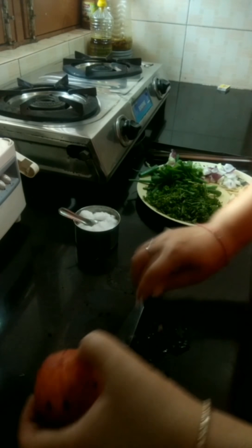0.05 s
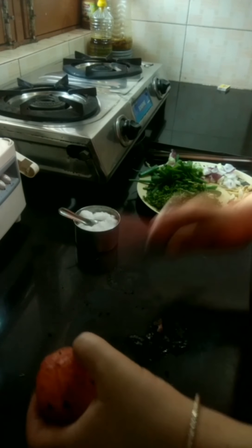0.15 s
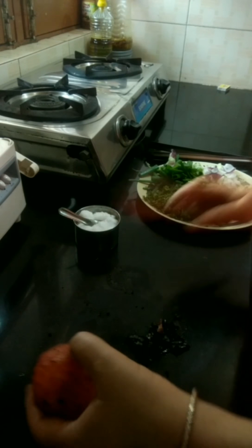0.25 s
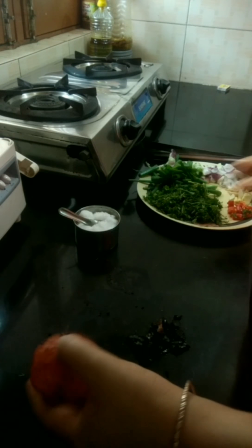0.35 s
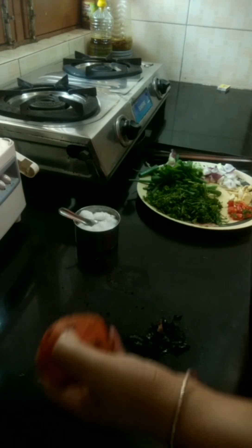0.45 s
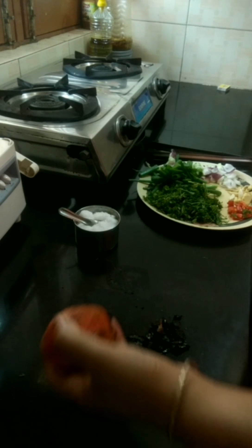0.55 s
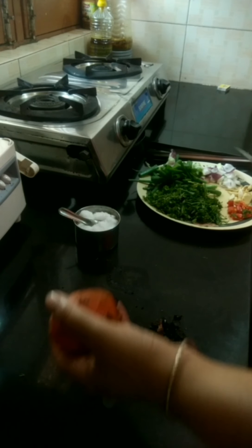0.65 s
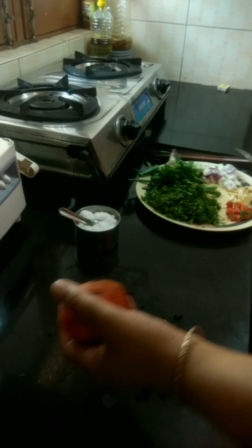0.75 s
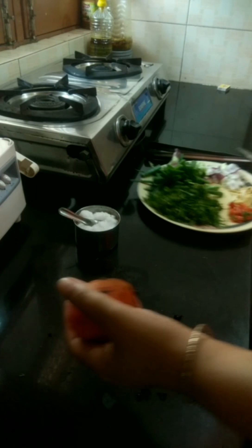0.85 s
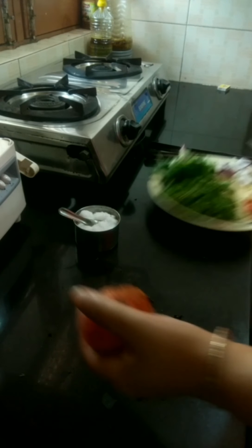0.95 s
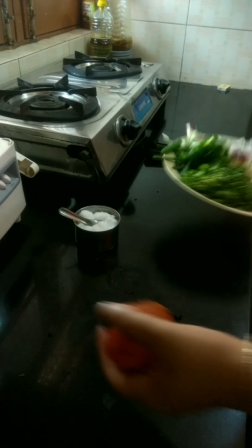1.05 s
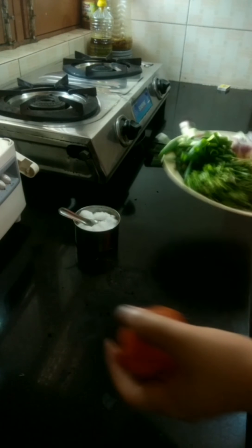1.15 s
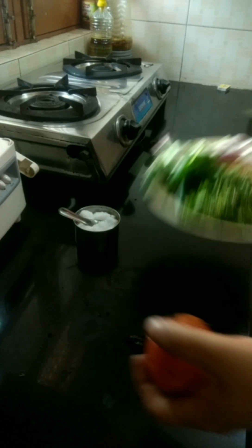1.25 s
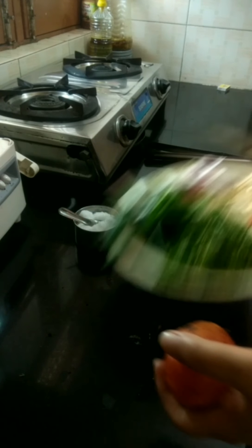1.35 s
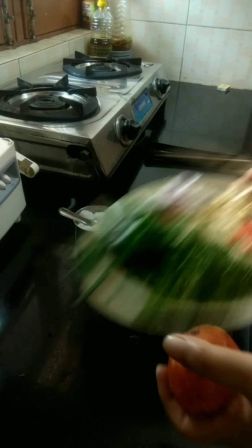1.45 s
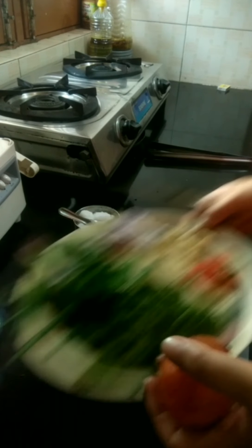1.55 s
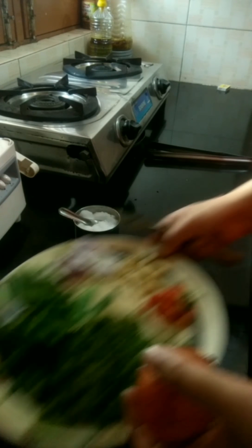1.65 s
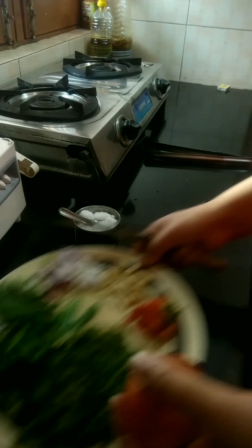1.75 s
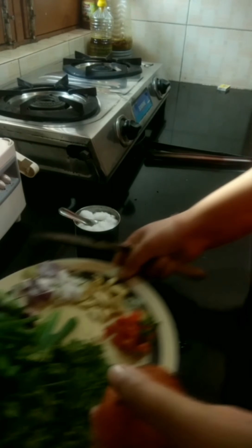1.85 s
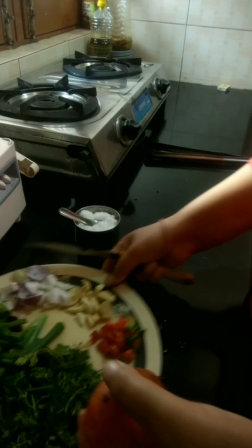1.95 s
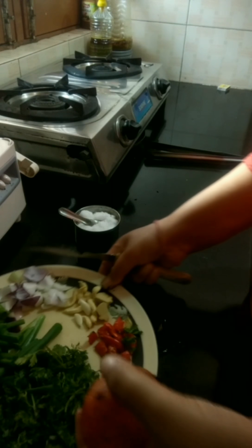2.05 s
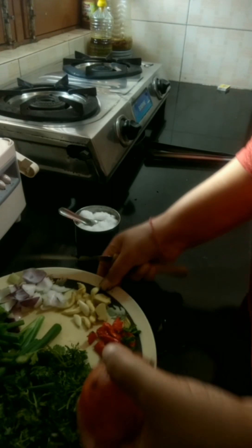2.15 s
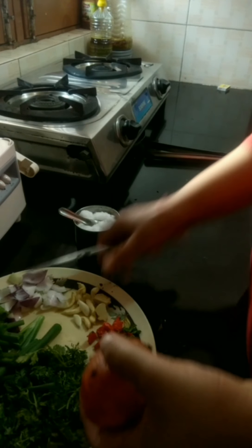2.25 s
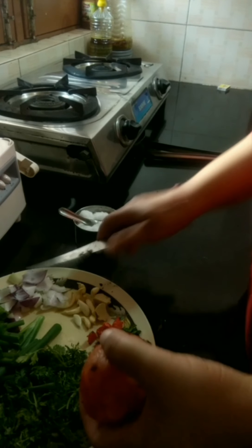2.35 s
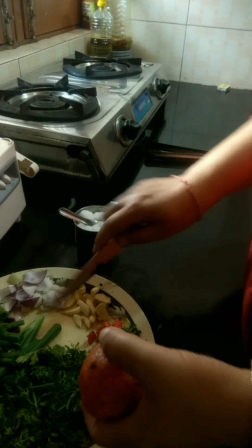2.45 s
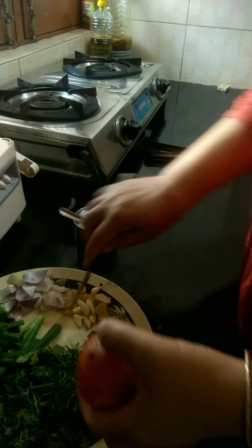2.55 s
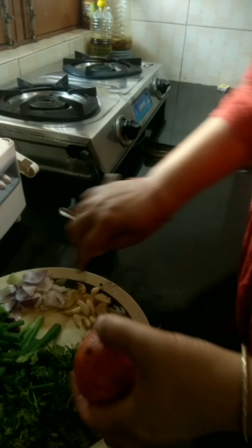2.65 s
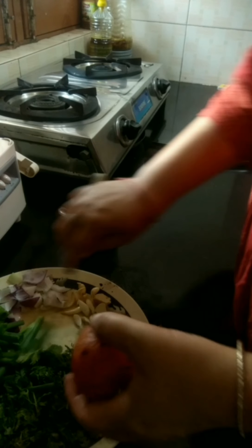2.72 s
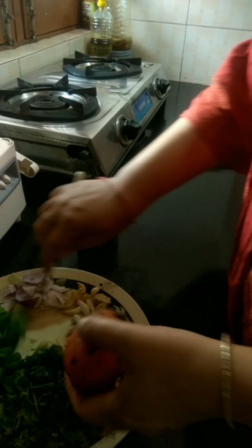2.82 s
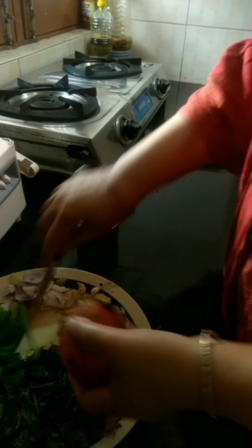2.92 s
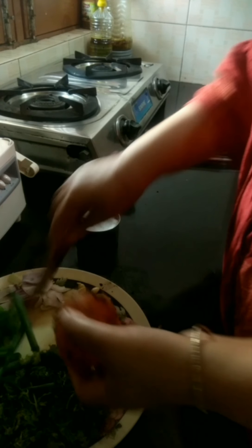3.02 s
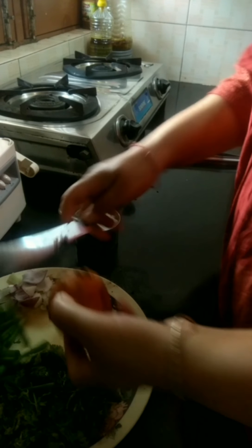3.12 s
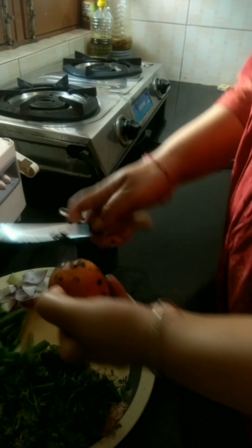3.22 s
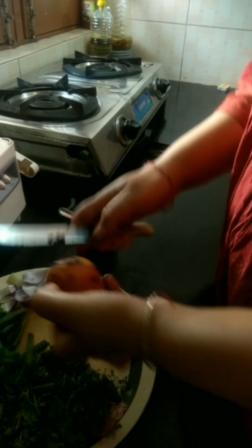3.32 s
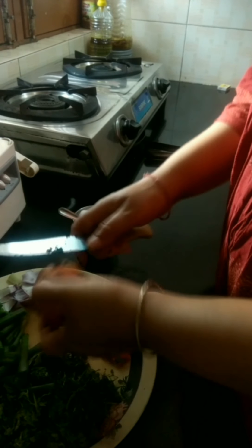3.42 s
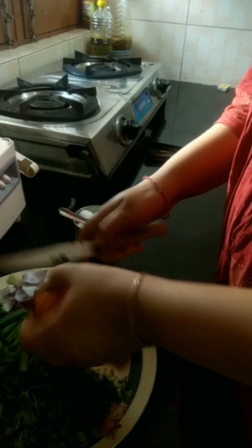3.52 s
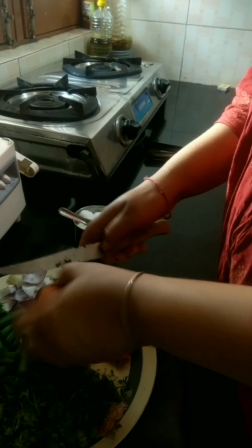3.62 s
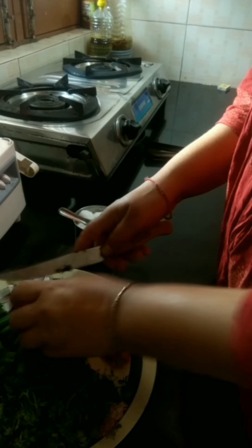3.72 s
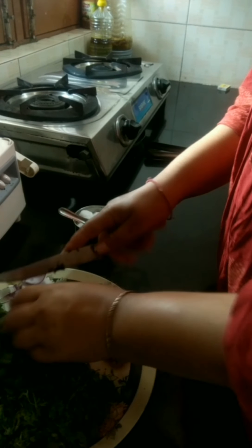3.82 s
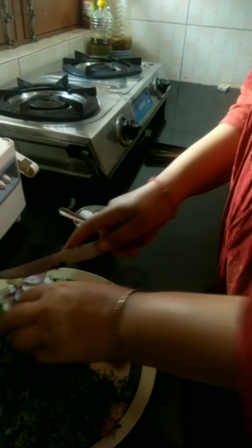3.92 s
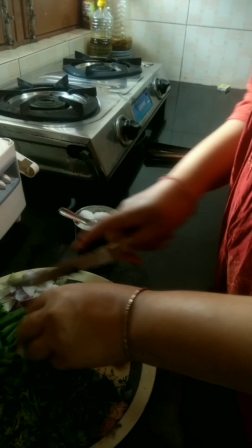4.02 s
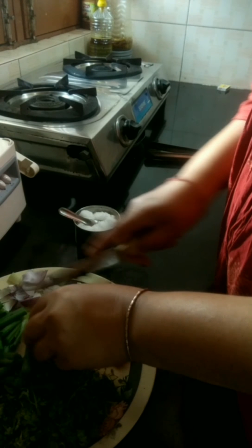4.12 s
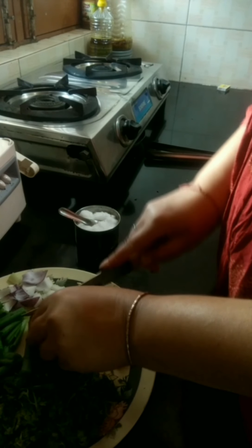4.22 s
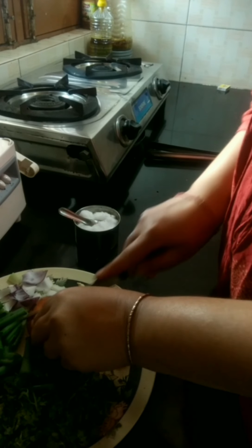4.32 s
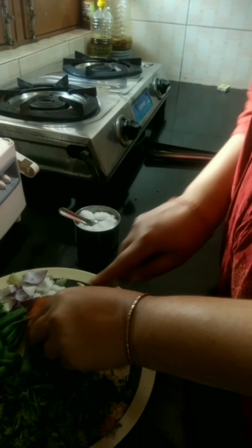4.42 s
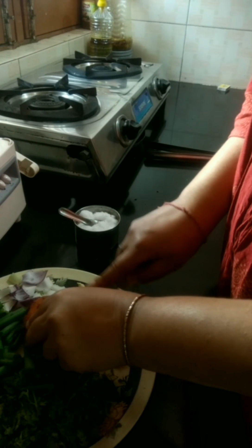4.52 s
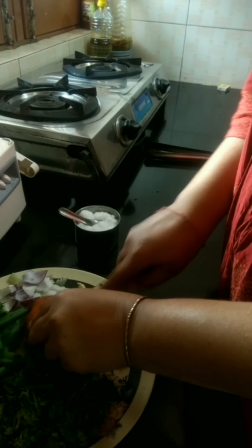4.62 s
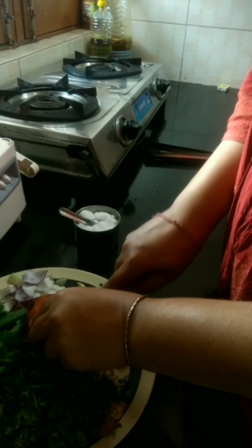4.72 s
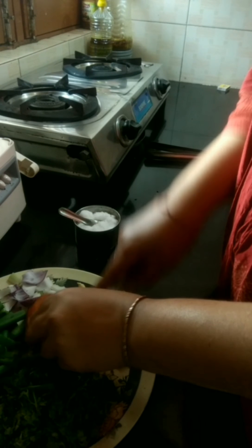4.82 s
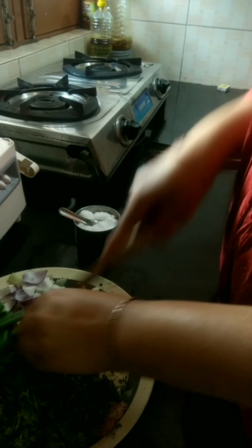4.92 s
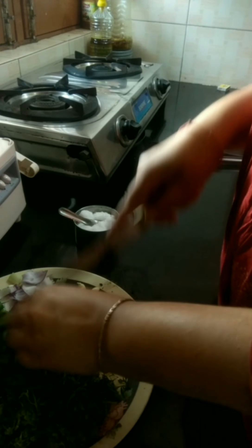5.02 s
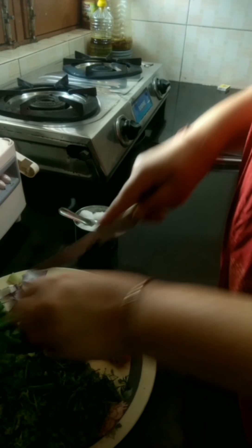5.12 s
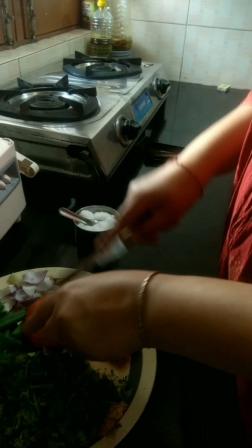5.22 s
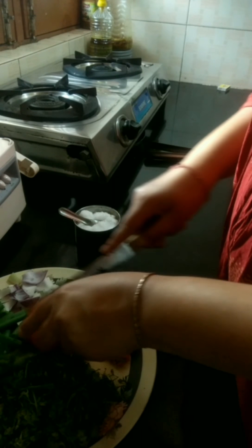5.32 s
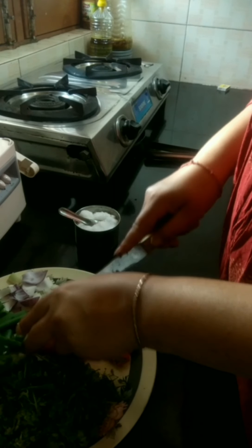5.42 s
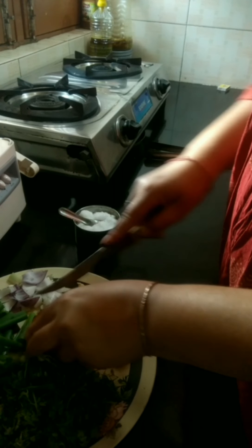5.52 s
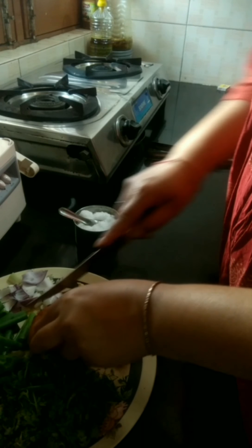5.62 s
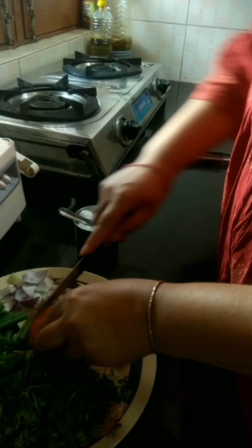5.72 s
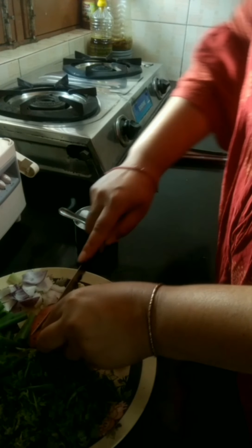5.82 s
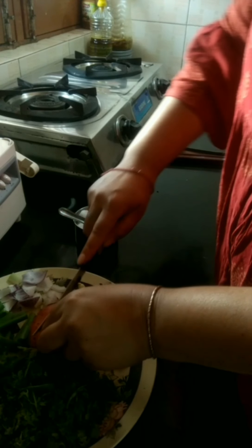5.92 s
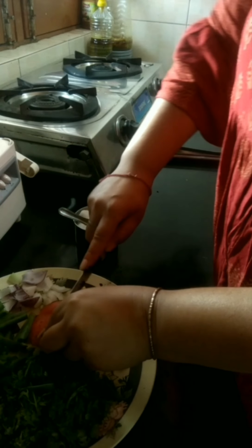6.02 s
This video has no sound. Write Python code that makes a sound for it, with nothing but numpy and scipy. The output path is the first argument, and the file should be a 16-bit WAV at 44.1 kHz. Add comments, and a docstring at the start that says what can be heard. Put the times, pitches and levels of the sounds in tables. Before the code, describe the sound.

Close, hissy stereo pickup in a hard little kitchen, with rumble and weak motor tones throughout. Fingers rustle faintly on food; a plastic plate meets the stone counter with two sharp clacks and dull booms. A short gritty knife scrape follows, stronger on the right. Then faint handling bumps, a quiet gap, and a crisp blade-on-plate knock with a trailing clatter. Only soft thumps and background remain.

```python
"""A broad hiss with a rumble and a faint motor hum fill a small tiled kitchen all through; noise and wavering tones make them.
Soft thuds and a rustle of fingers on food come first, then a plastic plate is set down on a stone counter.
A knife scrapes food across the plate; later, after another rustle, it cuts through a tomato onto it.
Contact bursts and scrape are random clicks that ring the plate (bursts also the blade); thuds are soft pushes on the counter.
Echoes follow, and two unequal microphone ports and a limiter hear it all."""
import sys
import numpy as np
from scipy import signal
from scipy.fft import rfft, irfft
from scipy.io import wavfile

SR = 44100
rng = np.random.default_rng(int(sys.argv[2]) if len(sys.argv) > 2 else 0)


def waveform_to_disk(signal):
    """Save audio, clipped to [-1, 1], as 16-bit WAV at the path in sys.argv[1]."""
    frames = np.transpose(np.atleast_2d(signal))
    scaled = np.clip(frames, -1, 1) * 32767
    samples = np.round(scaled).astype(np.int16)
    wavfile.write(sys.argv[1], SR, samples)


N = 267687  # length in samples

# hiss and rumble before they are scaled to HISS_DB: f/Hz, relative level per Hz/dB, left minus right/dB
HISS_SPECTRUM = [(30, -39.5, -18), (59.5, -16.5, 0), (99, -13, -0.5), (167, -15.5, 0), (400, -13, 0),
                 (515, -15, -1), (625, -13.5, 6), (950, -19.5, 6), (1560, -21, -1.5), (3096, -15.5, 1.5),
                 (3870, -6, -10), (8000, -9, -6.5), (10600, -5.5, -5), (15000, -10.5, -10)]
# how alike left and right noise are: f/Hz, likeness (0 to 1)
LEFT_RIGHT_LIKENESS = [(60, 0.98), (300, 1), (520, 1), (700, 0.24), (1200, 0), (15000, 0.18)]
# motor tones before waver and left-right balance: f/Hz, rms level/dB
HUM_TONES = [(102, -80.5), (210, -73), (344, -81), (443, -61.5), (543.7, -69.5), (640.6, -70.5)]
# thuds through the counter: t/s, push level/dB, dull above f/Hz, share of the free ring time, left minus right/dB
THUDS = [(1.85, -28.5, 406, 0.8, 1), (2.143, -29.5, 302, 0.75, 1.5), (3.828, -44, 105, 0.93, -1),
         (3.863, -56, 105, 0.84, 3), (3.905, -53, 109, 1, -3), (3.934, -54, 110, .8, 1),
         (4.67, -33, 141, 0.56, -1), (5.402, -58, 700, 0.62, 1), (5.405, -37.5, 108, 0.31, -4.5),
         (.66, -56, 130, 0.78, 0), (1.535, -48, 153, 0.35, -5), (5.211, -53, 132, 0.98, -2)]
# ways the free counter slab rings: f/Hz, level/dB, time to fall 60 dB/s
COUNTER_MODES = [(40, -2.5, 0.052), (71, -5, 0.12), (92, -1, 0.12), (139, -4, 0.13), (226, 8.5, 0.062),
                 (632, 14, 0.11)]
# fingers on food: t/s, level/dB, swell length/s
RUSTLES = [(0.812, -53, 0.056), (3.812, -54, 0.025)]
# bursts of contact noise, sharp blows and softer swells of grit:
# t/s, level/dB, dull above f/Hz, thin below f/Hz, clatter time to fall 60 dB/s,
# then the boost of lower plate modes/dB, upper plate modes/dB, blade/dB, and left minus right/dB
CONTACT_BURSTS = [(1.8513, 8, 10600, 380, 0.0064, 3, -2, -58, -1.5),
                  (1.8558, 7.5, 10700, 380, 0.005, -15, 3.5, -60, -8.5),
                  (1.8592, 9.5, 11100, 374, 0.0091, -0.5, -8, -63, 8.5),
                  (1.871, 2, 11500, 397, 0.13, 0, 5, -60, -5.5),
                  (1.8836, -1, 11000, 500, 0.012, -28, -20, -60, 14),
                  (2.1452, 7.5, 10400, 400, 0.007, -11, -1, -60, -4.5),
                  (2.1496, 7.5, 10600, 400, 0.007, -13, 1, -58, -2.5),
                  (2.1528, 5.5, 10700, 290, 0.0046, -22, -9, -63, 3.5),
                  (2.163, -2, 10800, 400, 0.085, -23, -18, -58, -3.5),
                  (2.179, -14.5, 9000, 300, 0.0087, 10, -12, -60, 0),
                  (2.9016, -11.5, 2400, 890, 0.039, -29, 0, -60, -4),
                  (2.915, -24.5, 2200, 1000, 0.24, -29, 7.5, -60, -6),
                  (4.651, -8.5, 15000, 950, 1, -35, 8.5, -19, -5.5),
                  (4.6734, 8, 12000, 340, 0.024, -12, -14, 9, 6.5),
                  (4.675, 7.5, 13900, 1080, 0.31, -44, -8.5, -21.5, -2),
                  (4.682, 10.5, 14300, 1100, 0.007, -30, 5, -12, -7),
                  (4.6865, 14, 14000, 1110, 0.0055, -16, -1, -12, 9),
                  (4.692, 5, 14000, 1100, 0.01, -25, -1.5, 6.5, 0),
                  (4.697, 0, 14000, 1100, 0.005, -27.5, -15, -1, -2),
                  (4.7135, -7, 14000, 600, 0.0089, 2, -19, -14, 1),
                  (4.7284, 2, 9000, 900, 0.017, -29, -5, -8, 6),
                  (4.742, 3.5, 14000, 900, 0.0077, -20, 0, -6, 1),
                  (4.773, -11, 9000, 900, 0.011, -23, 7, -8, -3),
                  (4.803, -13, 9000, 900, 0.0093, -11, 5, -2, -9),
                  (4.815, -12.5, 3570, 1100, 0.35, -30, 2, -21, -4.5)]
# ways the plate rings: f/Hz, relative level/dB, time to fall 60 dB/s
PLATE_MODES = [(365, 1, 0.032), (472, -1, 0.032), (571, -8.5, 0.045), (683, -1, 0.054), (1000, 0, 0.012),
               (1046, -4, 0.028), (1421, -5.5, 0.022), (1604, -4.5, 0.046), (2082, -1.5, 0.017),
               (2400, 2.5, 0.0067), (2698, -2, 0.017), (2872, 3.5, 0.007), (3336, -5, 0.011),
               (3340, -5, 0.011)]
# ways the knife blade rings: f/Hz, relative level/dB, time to fall 60 dB/s
BLADE_MODES = [(1474, -1.5, 0.035), (2200, -6, 0.017), (2810, -8, 0.036), (5170, -2.5, 0.015),
               (10000, -3.5, 0.018)]
# colour of the crack and clatter: f/Hz, gain/dB
CONTACT_COLOUR = [(2000, 0.5), (3600, -1.5), (4800, -2), (6500, 6.5), (10000, 5.5), (15500, 3.5)]
# knife pushed over the plate catches and slips: t/s, level/dB, hold/s
CATCHES = [(2.698, -43.5, 0.018), (2.723, -32, 0.026), (2.747, -32, 0.045), (2.793, -34, 0.0089),
           (2.819, -33, 0.0044)]
# colour of the scrape: f/Hz, gain/dB
SCRAPE_COLOUR = [(600, -43), (850, -13), (1000, 8), (1500, 1.5), (2000, -6.5), (2800, -7.5), (4200, -5),
                 (5000, -12), (11000, -16)]
# how long the kitchen echoes: f/Hz, time to fall 60 dB/s
ECHO_T60 = [(100, 0.52), (300, 0.22), (700, 0.18), (2000, 0.31), (6000, 0.23), (12000, 0.26)]
# colour of the two microphone ports: f/Hz, left gain/dB, right gain/dB
PORTS = [(100, 0, 0), (450, 0, 0), (750, 4, -1), (1250, -5, 4), (2000, 0, 4), (3400, -2, 3),
         (3750, -12, -9), (4150, -2, -2), (5800, -4, -3), (6200, -6, -7), (6800, -4, 1), (9100, -9, 3),
         (9700, 0, 6), (12000, 1, 1), (15300, -3, -7)]

HISS_DB, HISS_WAVER_DB, RUMBLE_WAVER_DB = -38.5, 0.6, 2.9
HUM_WAVER_DB, HUM_WAVER_RAD = 1.5, 0.86
# faint rise of noise just ahead of each onset: level, growth per dB of the burst, rise
ONSET_SWELL_DB, ONSET_SWELL_PER_DB, ONSET_SWELL_DB_S = -22, 1.0, 704
ONSET_SHARE = 0.025  # rise time of a clatter as a share of its fall time
CLATTER_LUMPY_DB, CLATTER_STOPS_S, CLATTER_STOP_DB_S = 2.5, 0.14, 700
OWN_CLATTER = 0.47  # share of the clatter power that only one port hears
CRACK_DB, CRACK_UNDER_S, CRACK_WIDTH_S = 12, 0.03, 0.00006  # first touch: only for clatters shorter than CRACK_UNDER_S
UPPER_MODES_HZ = 900  # plate modes from here up count as upper
SCRAPE_RISE_DB_S, SCRAPE_FALL_DB_S = 3000, 900
BURST_ECHO_DB, ECHO_DB, ECHO_BUILD_S, ECHO_LUMPY_DB = -7, 4.5, 0.00043, 2
LEFT_LAG_S = 0.00045  # the left port is farther from the plate
LIMIT_DB, RELEASE_DB_S, SQUEEZE = -16.5, 238, 0.33  # SQUEEZE: dB taken off per dB over the limit
CUTOFF_HZ = 15640


def amp(db):
    """Turn a level in dB into a gain."""
    return 10 ** (np.asarray(db) / 20)


def rms_one(x):
    """Scale a sound so its rms, its average strength, is 1."""
    return x / np.sqrt(np.mean(x ** 2) + 1e-20)


def pan(db):
    """Left and right gains for a level difference in dB, half to each side."""
    return amp(np.multiply.outer([0.5, -0.5], np.atleast_1d(db)))


def at_hz(points, hz, column=1):
    """Read a table column between its points, on a log-frequency axis."""
    table = np.array(points)
    return np.interp(np.log(hz + 1), np.log(table[:, 0]), table[:, column])


def butter(x, order, hz, kind="low"):
    """Smooth Butterworth filter: keep the lows, the highs or a band."""
    return signal.sosfilt(signal.butter(order, hz, kind, fs=SR, output="sos"), x)


def colour(x, points, column=1):
    """Filter with the tabled response and no sound ahead of its cause (minimum phase)."""
    response_db = at_hz(points, np.fft.rfftfreq(8192, 1 / SR), column)
    cepstrum = irfft(np.log(amp(response_db)))
    # folding the second half onto the first makes the filter minimum phase
    cepstrum[1:4096] *= 2
    cepstrum[4097:] = 0
    impulse = irfft(np.exp(rfft(cepstrum)))
    return signal.oaconvolve(x, impulse)[:len(x)]


def stereo_noise(size):
    """Spectra of two noises, alike in the bass and different in the treble, and their frequencies."""
    hz = np.fft.rfftfreq(size, 1 / SR)
    mid, side = rfft(rng.standard_normal((2, size)))
    alike = at_hz(LEFT_RIGHT_LIKENESS, hz)
    shared = np.sqrt(0.5 + alike / 2) * mid
    opposed = np.sqrt(0.5 - alike / 2) * side
    return shared + opposed * [[1], [-1]], hz


def drift(rate):
    """Random wandering: lines between random knots of spread 1, `rate` knots per second."""
    knots = rng.standard_normal(1000)
    return np.interp(np.arange(N) / SR * rate, np.arange(1000), knots)


def ring(x, modes):
    """Struck modes: a unit click makes each one a dying sine of its tabled height."""
    out = 0
    for k, (hz, db, t60) in enumerate(modes):
        r = amp(-60 / (t60 * SR))  # shrink per sample
        w = 2 * np.pi * hz / SR  # turn per sample
        mode = signal.lfilter([0, amp(db) * np.sin(w)], [1, -2 * r * np.cos(w), r * r], x + 1e-18)
        out = out + (-1) ** k * mode  # signs alternate
    return out


def grit(size, per_s, uneven_db):
    """Rough contact: random clicks of uneven size and either sign, scaled to rms 1."""
    extra_db = uneven_db * np.minimum(rng.exponential(1, size), 4)
    sizes = amp(extra_db) * rng.choice([-1, 1], size)
    return rms_one(sizes * (rng.random(size) < per_s / SR))


def hiss():
    """Bright noise, almost steady, over a lumpier rumble; the two cross over near 250 Hz."""
    spectra, hz = stereo_noise(N)
    balance = pan(at_hz(HISS_SPECTRUM, hz, column=2))
    spectra = spectra * amp(at_hz(HISS_SPECTRUM, hz)) * balance
    bass = 1 / (1 + (hz / 250) ** 4)
    bright = amp(HISS_WAVER_DB * drift(2.37)) * irfft(spectra * (1 - bass), N)
    rumble = amp(RUMBLE_WAVER_DB * drift(4.84)) * irfft(spectra * bass, N)
    return amp(HISS_DB) * rms_one(bright + rumble)


def hum():
    """Motor tones from the side of the rumble, wavering a little in level and phase."""
    t, total = np.arange(N) / SR, 0
    for hz, db in HUM_TONES:
        level = np.sqrt(2) * amp(db + HUM_WAVER_DB * drift(6.7))  # sqrt(2): rms to peak
        tone = np.sin(2 * np.pi * hz * t + HUM_WAVER_RAD * drift(2.57))
        total = total + level * pan(at_hz(HISS_SPECTRUM, hz, column=2)) * tone
    return total


def thuds():
    """Soft pushes, dulled clicks, set the counter slab booming for a share of its free ring time."""
    out, click = np.zeros((2, N)), np.arange(SR // 2) == 0
    for s, db, dull_hz, share, pan_db in THUDS:
        push = butter(click, 3, dull_hz)
        modes = [(hz, gain_db, share * t60) for hz, gain_db, t60 in COUNTER_MODES]
        at = round(s * SR)
        out[:, at:at + len(click)] += amp(db) * pan(pan_db) * ring(push, modes)
    return out


def rustles():
    """Fingers on food: short swells of fine grains around 2.5 kHz."""
    t = np.arange(N) / SR
    grains = butter(grit(N, 2300.0, 4.8), 2, [2100, 3600], "band")
    swells = sum(amp(db) * np.exp(-((t - s) / length) ** 2) for s, db, length in RUSTLES)
    return rms_one(grains) * swells


def burst_shape(t, db, clatter_s):
    """Level of a burst: faint rise of noise just ahead of the onset, quick rise, lumpy fall, sudden stop."""
    after = np.maximum(t, 0)
    onset_swell = np.where(t < 0, amp(ONSET_SWELL_DB + ONSET_SWELL_PER_DB * db + ONSET_SWELL_DB_S * t), 0)
    rise = 1 - np.exp(-after / (ONSET_SHARE * clatter_s))
    fall = amp(-60 * after / clatter_s)
    stop_db = CLATTER_STOP_DB_S * np.maximum(t - CLATTER_STOPS_S, 0)
    return (onset_swell + rise * fall) * amp(CLATTER_LUMPY_DB * drift(116.6)[:len(t)] - stop_db)


def contact_bursts():
    """Grit, with a sharp crack if short, rings plate and blade; gives direct sound and echo feed."""
    direct, t = np.zeros((2, N)), np.arange(SR // 3) / SR - 0.03
    for s, db, dull_hz, thin_hz, clatter_s, low_db, high_db, blade_db, pan_db in CONTACT_BURSTS:
        shape = burst_shape(t, db, clatter_s)
        touch = amp(CRACK_DB) * (clatter_s < CRACK_UNDER_S) * np.exp(-(t / CRACK_WIDTH_S) ** 2)
        plate = [(hz, g + (low_db if hz < UPPER_MODES_HZ else high_db), t60) for hz, g, t60 in PLATE_MODES]
        blade = [(hz, g + blade_db, t60) for hz, g, t60 in BLADE_MODES]
        shared, ports = grit(len(t), 9000.0, 4.4), []
        for _ in range(2):
            own = grit(len(t), 9000.0, 3.3)
            clatter = np.sqrt(1 - OWN_CLATTER) * shared + np.sqrt(OWN_CLATTER) * own
            contact = 0.22 * (clatter * shape + touch)
            # each port hears the modes at slightly different levels
            modes = [(hz, g + rng.normal(0, 2.6), t60) for hz, g, t60 in plate + blade]
            ports.append(colour(contact, CONTACT_COLOUR) + amp(-29.0) * ring(contact, modes))
        sound = butter(butter(ports, 4, dull_hz), 2, thin_hz, "high")
        at = round((s + t[0]) * SR)
        direct[:, at:at + len(t)] += amp(db) * pan(pan_db) * sound
    return direct, amp(BURST_ECHO_DB) * direct


def scrape():
    """The knife edge stutters over the plate: dense clicks ring its modes, louder on the right."""
    t, level = np.arange(N) / SR, 0
    for s, db, hold in CATCHES:
        rise_db = SCRAPE_RISE_DB_S * np.minimum(t - s, 0)
        fall_db = SCRAPE_FALL_DB_S * np.maximum(t - s - hold, 0)
        level = level + amp(np.maximum(db + rise_db - fall_db, -200))
    slips = grit(N, 2500.0, 3.0) * level
    return colour(slips + amp(-26.5) * ring(slips, PLATE_MODES), SCRAPE_COLOUR) * pan(-5.5)


def kitchen(x):
    """Dense echoes off the tiles: octave bands of noise, quick to build, each dying unevenly at its own rate."""
    size = SR
    spectra, hz = stereo_noise(size)
    t, echo = np.arange(size) / SR, 0
    for centre in 62.5 * 2 ** np.arange(9):
        band = np.clip(1 - abs(np.log2((hz + 1) / centre)), 0, 1)
        fall_db = 60 * t / at_hz(ECHO_T60, centre)
        echo = echo + irfft(spectra * band, size) * amp(ECHO_LUMPY_DB * drift(67.0)[:size] - fall_db)
    echo = echo * (1 - np.exp(-t / ECHO_BUILD_S)) / np.sqrt(SR / 30)
    return signal.oaconvolve(x, echo, axes=1)[:, :N]


def scene():
    """Add the contacts, delayed on the left, and their echo to the steady hiss and hum."""
    steady = hiss() + hum()
    soft = thuds() + rustles() + scrape()
    direct, feed = contact_bursts()
    close = direct + soft
    samples = np.arange(N)
    close[0] = np.interp(samples - np.round(LEFT_LAG_S * SR), samples, close[0])
    return close + amp(ECHO_DB) * kitchen(feed + soft) + steady


def record(dry):
    """Port colour, a limiter that ducks loud sounds and recovers, overload, and the top cut off."""
    x = np.array([colour(dry[0], PORTS, column=1), colour(dry[1], PORTS, column=2)])
    # smoothed power of the louder port; the 2 makes a steady sine read its peak
    power = signal.lfilter([0.01], [1, -0.99], 2 * (x ** 2).max(0))
    level_db = 10 * np.log10(power + 1e-12)
    # hold each peak level and let it sink at a steady rate
    ramp = RELEASE_DB_S * np.arange(N) / SR
    held_db = np.maximum.accumulate(level_db + ramp) - ramp
    duck_db = SQUEEZE * np.maximum(held_db - LIMIT_DB, 0)
    x = np.clip(x * amp(-duck_db), -1, 1)
    return signal.sosfilt(signal.ellip(10, 0.5, 60, CUTOFF_HZ, fs=SR, output="sos"), x)


dry = scene()
out = record(dry)
waveform_to_disk(out)
```